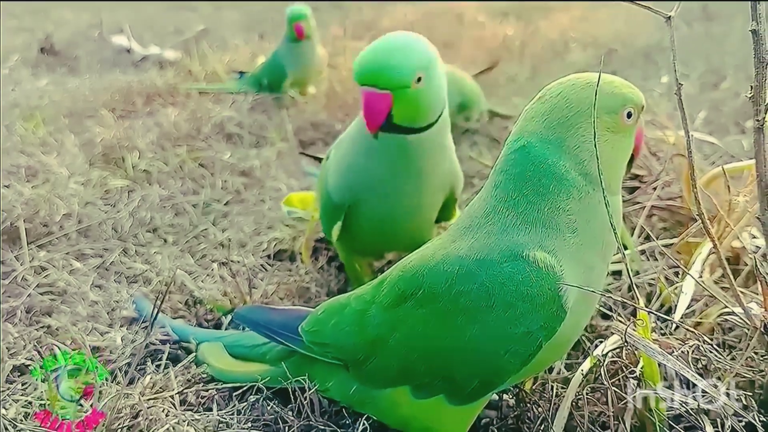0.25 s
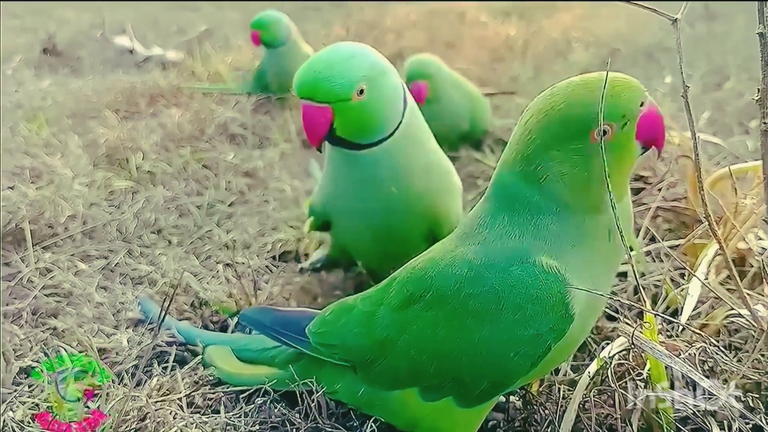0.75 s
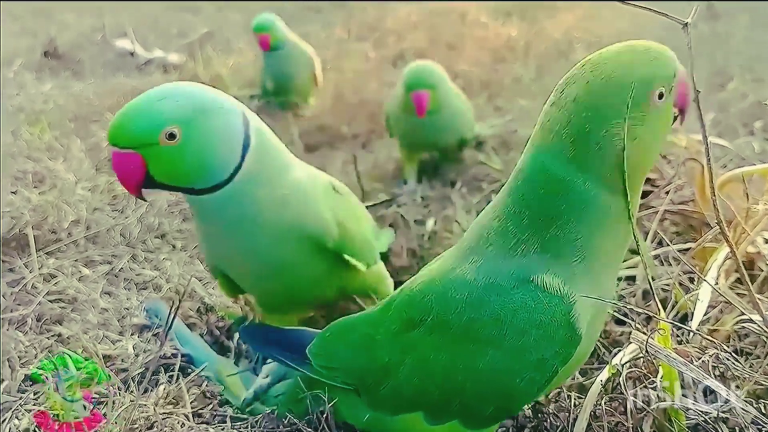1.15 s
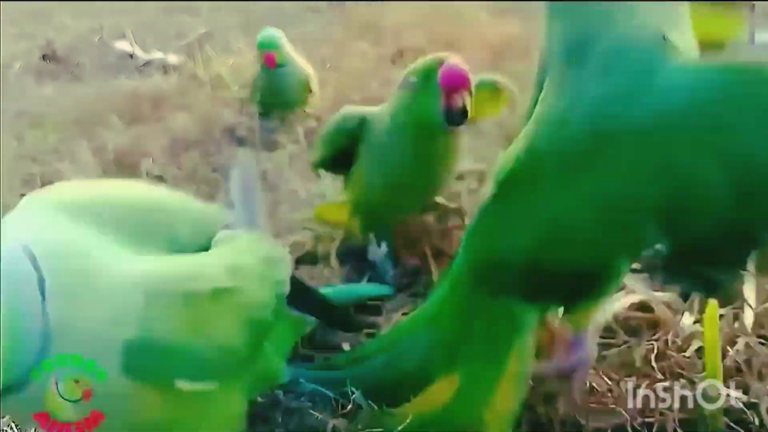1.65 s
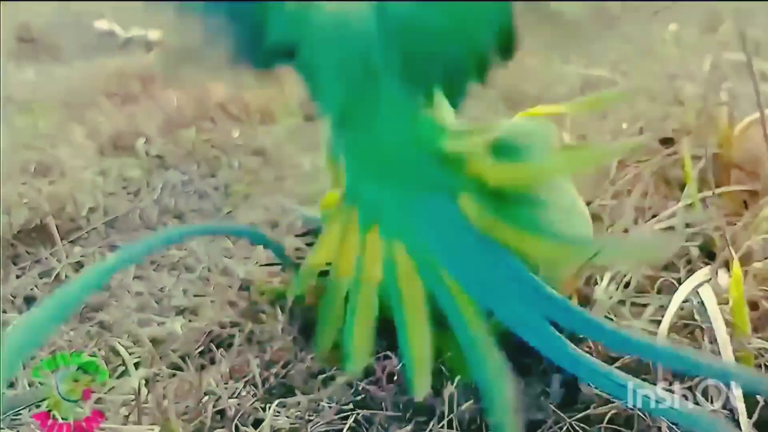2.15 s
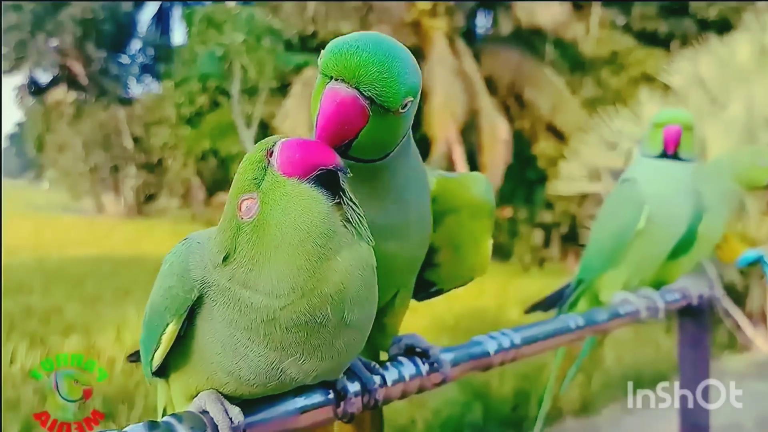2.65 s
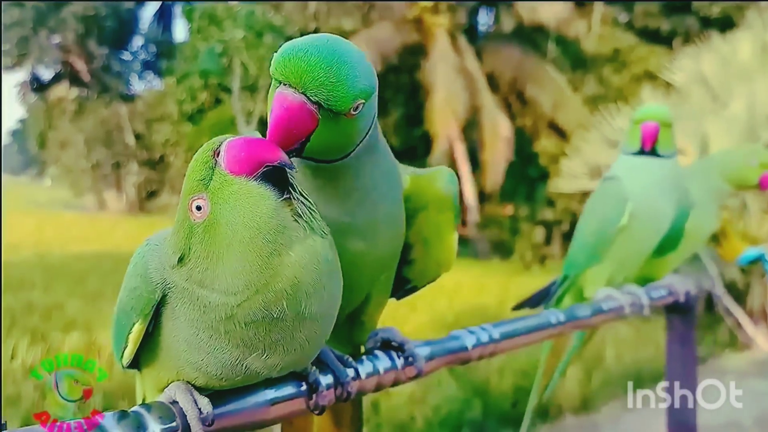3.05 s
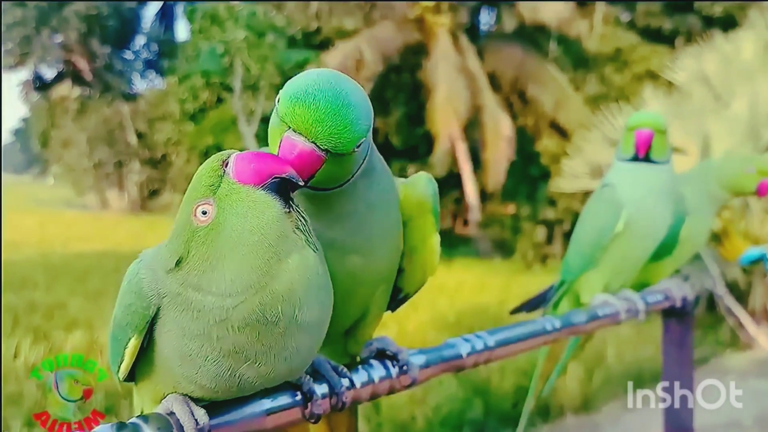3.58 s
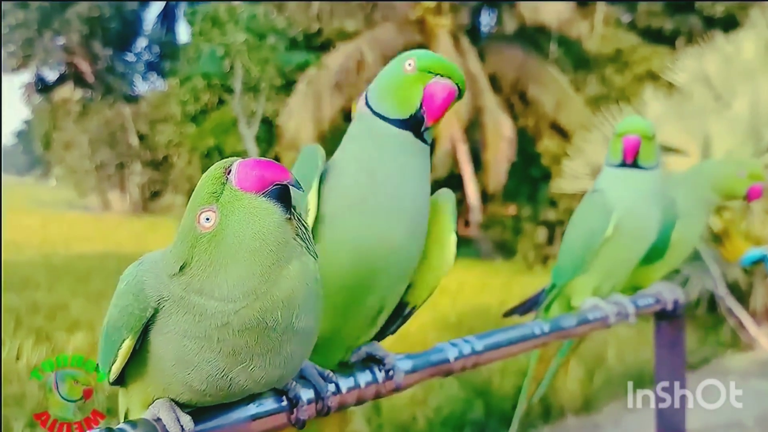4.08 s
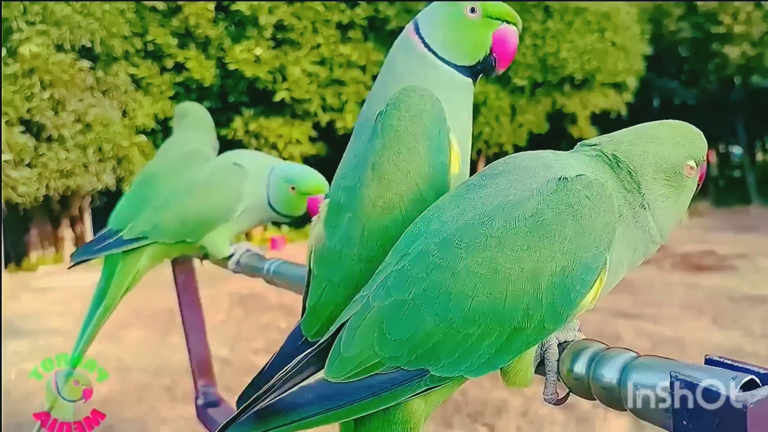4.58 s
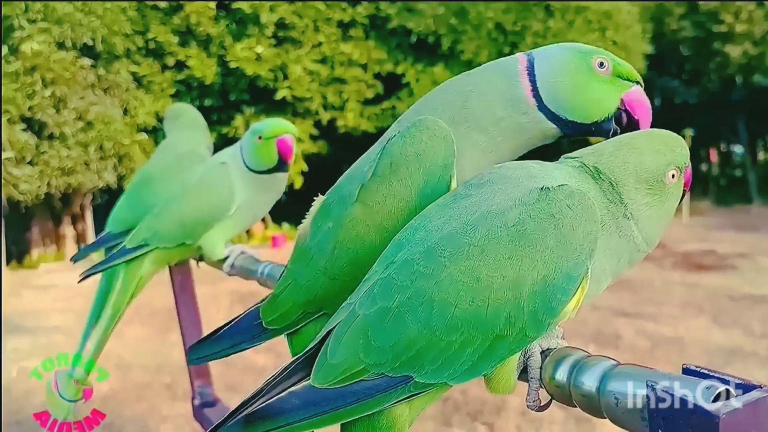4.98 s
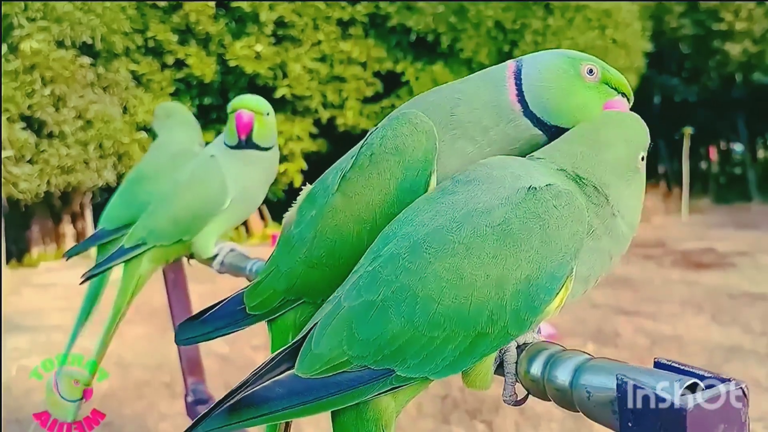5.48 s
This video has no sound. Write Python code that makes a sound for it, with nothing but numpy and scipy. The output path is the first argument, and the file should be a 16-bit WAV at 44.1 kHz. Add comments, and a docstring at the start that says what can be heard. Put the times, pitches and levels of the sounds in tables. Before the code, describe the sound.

Parakeets chatter, squawk hoarsely and whistle close by, over a distant screeching flock and a low outdoor rumble.

```python
"""Parakeets in the open

Close to a two-port microphone, one parakeet chatters and slides, one squawks hoarsely, one whistles,
with short clucks between. Each voice is syrinx overtones plus breath, shaped by the throat.
Far off, a flock screeches among trees, single birds chirp and a dove-like coo fades at the start.
A low rumble lies under all."""
import sys
import numpy as np
from scipy import signal
from scipy.fft import rfft, irfft, next_fast_len
from scipy.io import wavfile
from scipy.ndimage import uniform_filter1d, map_coordinates

SR = 44100
rng = np.random.default_rng(int(sys.argv[2]) if len(sys.argv) > 2 else 0)


def pcm_store(signal):
    """Save signal as 16-bit PCM."""
    levels = np.round(np.clip(np.atleast_2d(signal), -1, 1) * 32767)
    wavfile.write(sys.argv[1], SR, levels.astype(np.int16).T)


N = 252693
TOP_HZ = 15900


# Registers: pitch_hz, odd_overtones_db, brightness_db_per_octave
CHATTER_REGISTERS = [(440, 10, -3.5), (616, -15, -4.5), (670, -3, -3.5), (740, -8, -0.95), (830, -9, 0.2),
                     (900, -7, 0), (1050, 1.5, -3)]
SLIDE_REGISTERS = [(402, 13, -14), (660, -7, -1.5), (970, -21, 3.5), (1177, -0.5, 1.8), (1380, 10, 0.3),
                   (1560, 2, -2), (2550, 3.5, 0.5)]
SQUAWK_REGISTERS = [(550, -5, -9), (1223, -20, -4.5), (1470, -7, -1.5), (1700, -3, 2.5), (1928, -9, 3.5),
                    (1965, -28, 8.5), (2300, -27, 1)]
WHISTLE_REGISTERS = [(1120, -1, -3.5), (1327, 4.5, 2), (1560, 5.5, -1.5), (1790, -7, -2.5), (2260, 3, 1.2),
                     (2504, 9, -0.6), (3140, -0.5, -4)]
# Hoarseness: pitch_hz, breath_share, clear_overtones
CHATTER_ROUGH = [(450, .3, 7), (600, .08, 8), (740, .1, 13), (860, .18, 10), (960, .3, 5.5),
                 (1060, .36, 4.5)]
SLIDE_ROUGH = [(420, .16, 6), (700, .18, 8), (1000, .17, 9), (1200, .1, 9.5), (1700, .08, 6.5),
               (2500, .07, 4.5)]
SQUAWK_ROUGH = [(500, .4, 3), (1200, .55, 2.5), (1400, .85, 1.5), (1490, .995, 2), (1550, .55, 8),
                (1750, .44, 12), (1980, .38, 9), (2300, .58, 3)]
WHISTLE_ROUGH = [(1120, .45, 5), (1320, .22, 6.5), (1430, .5, 3.5), (1600, .27, 5), (2300, .26, 4.5),
                 (2430, .18, 5), (2485, .022, 6.5), (3100, .07, 5)]
# Throat responses: freq_hz, gain_db
CHATTER_THROAT = [(210, -39), (350, -9.5), (700, -11), (1050, -10), (1460, 0.5), (2050, 2), (2380, -16.5),
                  (2850, 2), (3800, 1), (4450, -16), (5110, -4.5), (5710, -3.5), (7960, -12), (8900, -27),
                  (12800, -15.5), (15500, -52)]
SLIDE_THROAT = [(210, -42), (350, -5), (1240, 2), (2390, -0.5), (2890, 1.5), (4160, 1.5), (4430, -1.5),
                (5110, -6.5), (7010, -12.5), (7960, -10), (9480, -17.5), (10600, -21.5), (15500, -21.5)]
SQUAWK_THROAT = [(240, -73), (400, -26), (1420, -18.5), (1910, -9.5), (2840, -7.5), (3850, 1.5),
                 (5000, -14), (6780, -3.5), (7440, -12.5), (9790, -9.5), (12300, -22), (14800, -33.5),
                 (15500, -67)]
WHISTLE_THROAT = [(470, -65), (800, -24), (1150, -11), (1600, -5.5), (1910, -2), (2500, 6.5), (3720, -4),
                  (5010, -5.5), (6510, -2.5), (7740, -4.5), (8870, -17), (13500, -13), (15500, -16)]
# Places, two lists each: freq_hz, left_minus_right_db; freq_hz, left_lead_rad
CHATTER_PLACE = ([(60, -2), (92, 4), (140, -2), (210, 0.0), (330, 7), (500, -0.5), (770, -1.5), (1170, -1),
                  (1790, -3), (2740, -11), (4190, 0.5), (6410, -10), (9810, -1), (15000, -1.5)], [(0, 3),
                  (2760, -1.4), (3790, -1.3), (4570, -9), (5340, -14), (6030, -8.5), (8100, -23.5),
                  (8700, -30), (9990, -8.5), (11000, -10), (11700, -25.5), (12900, -23.5), (14600, 5),
                  (16000, -12)])
SLIDE_PLACE = ([(60, 20), (92, -1), (140, -2), (210, -7), (330, -0.5), (500, -1.5), (770, -0.5),
                (1170, -3.5), (1790, 5.5), (2740, -9), (4190, -12.5), (6410, -4), (9810, 1.5), (15000, 0)],
                [(0, 4.5), (2070, -1.5), (2930, 4.5), (3530, -3), (4390, -5.5), (4650, -10.5), (5430, -6.5),
                (8270, -15), (8790, -12.5), (11000, -0.5), (11800, -8.5), (13200, -18), (14900, -27),
                (16000, -31)])
SQUAWK_PLACE = ([(60, -35), (110, -6), (200, 1), (380, -5), (700, -13.5), (1290, -4.5), (2380, -24.5),
                 (4400, -6.5), (8120, -6.5), (15000, -6.5)], [(0, 1), (430, 1.8), (1720, 11), (3360, 8.5),
                 (4570, 16.8), (6460, 17.2), (6980, 17.7), (9650, 24.7), (10100, 27.7), (12700, 17),
                 (14500, 2.5), (14700, 29), (15200, 10), (16000, 18)])
WHISTLE_PLACE = ([(60, -9), (99, 0.0), (160, 5), (270, -2), (450, 0), (740, 4), (1220, 2.5), (2010, -1.5),
                  (3330, -1.5), (5500, 2), (9080, -12), (15000, 1)], [(0, 5), (2240, -1.72), (2670, -2.5),
                  (3360, -7.5), (4050, -11), (5080, -18.0), (6550, -18), (7670, -27), (9220, -40),
                  (10100, -51), (11000, -50), (11900, -53.3), (14000, -53.5), (16000, -59)])
TURNED_PLACE = ([(60, 0.5), (110, -12), (200, -3), (380, 0.0), (700, -8), (1290, 3), (2380, -8.5),
                 (4400, -3.5), (8120, -10), (15000, 3)], [(0, 7), (2150, 5.5), (3270, -3), (3960, 3),
                 (4910, 3), (6200, -8.5), (7750, -15), (8440, -20.5), (8960, -33), (9560, -26),
                 (12400, -36), (14000, -33.5), (14600, -55), (16000, -46)])
# Contours, one list per note: time_s, pitch_hz, level_db
SLIDES = [
    [(4.019, 2570, -65), (4.03, 2625, -34.5), (4.045, 2570, -35), (4.068, 2450, -46.5), (4.082, 2550, -53)],
    [(4.086, 1770, -31), (4.091, 1687, -23.5), (4.11, 1503, -22), (4.152, 1349, -24), (4.24, 1175, -27),
     (4.275, 1102, -27.5), (4.288, 1038, -28), (4.33, 811, -31), (4.356, 574, -41.5), (4.375, 406, -48.5)],
    [(5.083, 445, -43.5), (5.099, 609, -43), (5.121, 730, -34), (5.141, 654, -37), (5.16, 460, -38),
     (5.174, 327, -47.5)],
]
WHISTLES = [
    [(5.272, 1130, -33), (5.277, 1107, -11), (5.283, 1140, -18.5)],
    [(5.284, 1100, -32), (5.288, 1112, -21), (5.291, 1130, -13.5), (5.294, 2246, -18.5), (5.32, 2446, -22),
     (5.36, 2562, -19), (5.41, 2521, -14.5), (5.427, 2278, -18.5), (5.431, 1715, -16), (5.445, 1485, -13),
     (5.455, 1418, -16.5), (5.459, 1360, -17.5), (5.481, 1311, -14.5), (5.505, 1305, -63)],
    [(5.6, 3130, -49), (5.608, 3133, -12.5), (5.622, 2816, -20), (5.651, 2624, -21.5), (5.7, 2510, -21.5),
     (5.74, 2472, -20.5)],
]

def parakeets(head_turn_s=5.55):
    """Near birds with a faint echo; the whistler turns its head for the last note."""
    whistles = voice(WHISTLES, WHISTLE_REGISTERS, WHISTLE_ROUGH, WHISTLE_THROAT, flutter_db=0.7,
                     breath_db_per_octave=-1.5)
    chatter = voice(chatter_notes(), CHATTER_REGISTERS, CHATTER_ROUGH, CHATTER_THROAT, flutter_db=3,
                    breath_db_per_octave=3)
    slides = voice(SLIDES, SLIDE_REGISTERS, SLIDE_ROUGH, SLIDE_THROAT, flutter_db=3.5,
                   breath_db_per_octave=4)
    squawks = voice(squawk_notes(), SQUAWK_REGISTERS, SQUAWK_ROUGH, SQUAWK_THROAT, flutter_db=6.5,
                    breath_db_per_octave=7)
    turned = np.arange(N) > head_turn_s * SR
    direct = (placed(chatter, CHATTER_PLACE, gain_db=1.5)
              + placed(slides, SLIDE_PLACE, gain_db=6)
              + placed(squawks, SQUAWK_PLACE, gain_db=3)
              + placed(whistles * ~turned, WHISTLE_PLACE, gain_db=3)
              + placed(whistles * turned, TURNED_PLACE, gain_db=4)
              + placed(clucks(), SLIDE_PLACE, gain_db=1.5))
    return direct + amp(-16) * tree_echo(direct[1])


def voice(notes, registers, rough, throat, flutter_db, breath_db_per_octave):
    """Syrinx overtones and breath puffing once a cycle, both shaped by the throat."""
    out = np.zeros((2, N))
    breath_gain = lambda hz: amp(along(throat, hz) + breath_db_per_octave * np.log2(hz / 3000 + 0.01))
    for rows in notes:
        first, count, fade = note_span(rows, edge_s=0.0022)
        hz, db, *hollow_db = uniform_filter1d(curves(rows, first, count), size=160, axis=1)
        odd_db, bright_db = columns_at(registers, hz)
        odd_db = odd_db + sum(hollow_db)  # hollow notes have weaker odd overtones
        breath_share, clear = columns_at(rough, hz)
        k = np.arange(1, min(24, TOP_HZ // hz.min()) + 1)[:, None]
        hz = hz * (1 + 0.03 * breath_share * wobble(300, count))
        phase = 2 * np.pi * np.cumsum(hz) / SR
        # Uneven cycles smear and weaken the upper overtones: rasp.
        jitter = wobble(2500, count) + 0.5 * np.array([wobble(2500, count) for _ in range(2)])[:, None]
        smear = np.minimum(k / clear, 1.5) ** 4 * jitter
        rolloff = (k * hz < TOP_HZ) / (1 + 0.82 * (k / clear) ** 2)
        breath = rng.standard_normal(count) + 1.3 * rng.standard_normal((2, count))
        puffs = unit_rms(filtered(breath, breath_gain)) * (1 + 0.23 * np.cos(phase))
        beak_db = flutter_db * np.array([wobble(33.1, count) for _ in k])  # the moving beak
        register_db = odd_db * (k % 2) * (k > 1) * (3 / k) ** 1.9 + bright_db * np.log2(k)
        weight = amp(along(throat, k * hz) + register_db + beak_db) * rolloff
        tone = np.sum(weight * np.cos(k * phase + 0.361 * k ** 2 + smear), axis=1)
        tone /= np.sqrt(np.sum(weight ** 2, axis=0) / 2)
        note = np.sqrt(1 - breath_share ** 2) * tone + breath_share * puffs
        out[:, first:first + count] += amp(db) * fade * note
    return out


# Chatter: start_s, length_s, first_hz, turn_after_s, turn_hz, last_hz, bend_exponent,
CHATTER = [(2.725, 0.089, 723, 0.037, 602, 777, 2.76, -33.5, 1, None, -5),
           (2.859, 0.12, 1003, 0.059, 715, 795, 2.7, -22.5, -14, -23.5, -3),
           (3.018, .119, 1032, .073, 741, 827, 2.4, -20.5, -15, -19.5, -4),
           (3.177, 0.12, 1056, 0.0079, 1067, 377, 1.08, -21, -33.5, -20, -7)]

def chatter_notes(linger=0.88, release_s=0.012, release_db=-30, pip_lead_s=0.016, pip_edge_db=-15.5):
    """Notes that glide to a turning pitch and leave it again, most just after a pip."""
    notes = []
    for start, length, first_hz, turn, turn_hz, last_hz, bend, db, sag_db, pip_db, hollow_db in CHATTER:
        if pip_db is not None:
            notes.append([(start - pip_lead_s * lead, first_hz, pip_db + pip_edge_db * edge)
                          for lead, edge in [(0.89, 0.45), (0.56, 0), (0.06, 1)]])
        t = np.linspace(0, length, num=40)
        before = np.clip(t / turn, 0, 1)
        after = np.clip((t - turn) / (length - turn), 0, 1)
        approach_hz = (first_hz - turn_hz) * (1 - before) ** 2 * (1 + linger * before)
        hz = turn_hz + approach_hz + (last_hz - turn_hz) * after ** bend
        release = np.clip(1 - (length - t) / release_s, 0, 1) ** 2
        level_db = db + sag_db * (t / length) ** 2.96 + release_db * release
        notes.append(np.transpose([start + t, hz, level_db, np.full_like(t, hollow_db)]))
    return notes


# Yelps, one list per note: time_s, pitch_hz, level_db
YELPS = [
    [(4.484, 619, -56), (4.498, 1011, -44.5), (4.508, 1240, -54)],
    [(4.515, 2003, -36.5), (4.53, 1974, -45.5), (4.54, 1962, -21.5), (4.552, 1880, -26.5),
     (4.57, 1610, -29)],
]
# Squawks: start_s, scoop_s, head_s, head_hz, head_db, body_s, body_hz, last_hz, body_db, tail_s
SQUAWKS = [(4.57, 0.0028, 0.0044, 2330, -32.5, 0.042, 1922, 1930, -26.5, .065),
           (4.753, 0.029, 0.024, 2282, -34.5, 0.083, 1813, 1522, -29.5, 0.055),
           (5.006, .032, .02, 2358, -30, .088, 1822, 1538, -28, 0.034)]

def squawk_notes(scoop_hz=505, break_hz=1200, tail_hz=1514, tail_db=-25.5):
    """Two yelps, then squawks that scoop up, break into a high head, drop to a body and end in breath."""
    notes = list(YELPS)
    for start, scoop, head, head_hz, head_db, body, body_hz, last_hz, body_db, tail in SQUAWKS:
        step_s, hz, db = np.transpose([
            (0, scoop_hz, head_db - 15.5), (0.6 * scoop, break_hz, head_db - 5.5),
            (0.4 * scoop, head_hz, head_db), (head, head_hz, head_db),
            (0.013, body_hz, body_db), (body, last_hz, body_db),
            (0.0068, tail_hz, body_db + tail_db / 4), (tail, tail_hz, body_db + tail_db)])
        notes.append(np.transpose([start + np.cumsum(step_s), hz, db]))
    return notes


# Clucks: start_s, level_db, pulse_rate_hz, length_s
CLUCKS = [(3.431, -58, 508, 0.02), (3.71, -59.5, 503, 0.023), (3.963, -28, 510.3, 0.017),
          (5.238, -25, 534.6, 0.01), (5.575, -29, 528, 0.016)]
# Cluck colour: freq_hz, gain_db
CLUCK_COLOUR = [(150, -46), (250, -7), (466, 3), (852, -4), (1920, 8), (2490, -7), (3220, 6), (4100, 2),
                (4470, -6.5), (6420, -4.5), (9890, -15.5), (11800, -15.5), (15500, -25)]

def clucks():
    """A few throat pulses and a puff under one short bump."""
    out = np.zeros(N)
    for start, db, rate_hz, length in CLUCKS:
        t = np.arange(round(length * SR)) / SR
        pulses = 6 * np.diff(np.floor(t * rate_hz), prepend=0)
        puff = 0.5 * rng.standard_normal(len(t))
        bump = np.sin(np.pi * (t / length) ** 0.4) ** 2
        out[round(start * SR):][:len(t)] += amp(db + 9.5) * (pulses + puff) * bump
    return coloured(out, CLUCK_COLOUR)


def placed(x, place, gain_db):
    """A near bird reaches the two ports with unlike strength and delay."""
    balance, lead = place
    ports = np.array([[0.5], [-0.5]])

    def response(hz):
        low_cut = 1 / (1 + (250 / (hz + 1)) ** 6)  # the near voices carry almost nothing below about 250 Hz
        return low_cut * amp(ports * along(balance, hz)) * np.exp(1j * ports * along(lead, hz))
    return amp(gain_db) * filtered(x, response)


# Chirps: start_s, length_s, first_hz, last_hz, glide_exponent, level_db
CHIRPS = [(0.061, 0.028, 4180, 5800, 1.1, -61), (0.081, 0.037, 5780, 5100, 0.87, -48.5),
          (0.128, 0.078, 4490, 3910, 1.26, -39), (0.23, 0.053, 3574, 3180, 1.13, -29.5),
          (0.718, 0.059, 3610, 4340, 2, -48), (0.795, 0.094, 2760, 2660, 0.82, -45.5),
          (0.93, 0.095, 3210, 3290, 0.91, -47), (1.14, 0.044, 3530, 3370, 0.79, -45),
          (1.252, 0.083, 2780, 2750, 1.1, -50), (1.51, 0.064, 2760, 2690, 1.3, -57),
          (2.06, 0.049, 2900, 1825, 1.25, -50), (2.116, 0.058, 3250, 3120, 1.4, -42.5),
          (2.24, .07, 4150, 4770, .9, -59), (2.41, 0.12, 3135, 3440, 1.7, -58),
          (2.485, 0.11, 3140, 2020, 6.5, -45), (3.129, 0.029, 3130, 3350, .9, -35),
          (3.333, 0.12, 4730, 4430, 1.7, -58.5), (3.459, 0.12, 3150, 3220, 1.4, -56),
          (3.561, 0.091, 3230, 3300, 0.81, -51), (3.686, 0.054, 3600, 4130, 1.18, -56),
          (3.747, 0.021, 4300, 3280, 1.08, -54)]
# Coo: time_s, pitch_hz, level_db
COO = [(0.02, 570, -66), (0.074, 676, -60), (0.11, 705, -75), (0.17, 766, -105), (0.212, 735, -55),
       (0.3, 754, -58.5), (0.452, 681, -62), (0.544, 607, -61), (0.78, 567, -82)]

def far_birds():
    """Gliding, fading chirps and a coo from the left, softened by their echo."""
    u = np.linspace(0, 1, num=20)
    fade_db = np.interp(u, [0, 0.41, 1], [1.5, 0, -4])
    notes = []
    for start, length, first_hz, last_hz, glide, db in CHIRPS:
        hz = last_hz + (first_hz - last_hz) * (1 - u) ** glide
        notes.append(np.transpose([start + length * u, hz, db + fade_db]))
    chirps = wavering_tones(notes, waver=0.018)
    coo = wavering_tones([COO], waver=0.01)
    cooing = amp(2.5) * from_left(coo) + amp(-0.5) * tree_echo(coo)
    return cooing + amp(2) * from_left(chirps) + amp(-1) * tree_echo(chirps)


# Noise spectra: freq_hz, gain_db
SCREECH = [(710, -87), (1200, -76), (1580, -31.5), (2430, 0), (2740, 1), (3070, 5.5), (3270, 3), (3750, 0),
           (4630, -3), (5150, -31), (6500, -23.5), (8450, -38), (14300, -120)]
RASP = [(2650, -76), (4500, 6.5), (5130, -0.5), (7810, -6.5), (8450, -7.5), (12900, -18), (14100, -18.5),
        (15500, -23), (15800, -58)]
HISS = [(530, -12), (900, -19.5), (1510, -2), (1660, -36), (2190, 2), (2410, -16), (5370, 4), (13400, -1),
        (14900, -35), (15800, -33)]
# Flock and wash width: freq_hz, left_right_correlation
FLOCK_CORRELATION = [(60, 0.93), (180, 0.84), (550, 0.25), (1650, 0.49), (4970, -0.23), (15000, 0.16)]

def flock_and_wash(split_hz=3500):
    """Patchy noise over faint hiss: far screeches blurred by trees, then the near calls' echo wash."""
    low_gain, high_gain, rasp_gain = swell_gains()
    throb_db = 0.3 * wobble(29.94)
    crowd = patchy_noise(SCREECH, FLOCK_CORRELATION, patchy_db=6) + amp(-12) * twittering(count=240)
    low = filtered(crowd, lambda hz: 1 / (1 + (hz / split_hz) ** 12))
    screech = low_gain * low + high_gain * (crowd - low)
    hiss = amp(-72.5) * unit_rms(coloured(rng.standard_normal((2, N)), HISS))
    rasp = amp(1) * rasp_gain * patchy_noise(RASP, FLOCK_CORRELATION, patchy_db=6.5)
    return amp(throb_db) * (screech + rasp) + hiss


# Swells of far flock screeching; the last two are the echo wash of the near calls:
# start_s, rise_s, hold_s, fall_s, screech_db, rasp_db, high_minus_low_db
SWELLS = [(-0.04, 0.031, .02, .06, -58.5, -77, -10), (0.111, 0.032, 0.1, 0.093, -32, -32.5, 13),
          (0.295, 0.023, 0.17, 0.079, -48.5, -54.5, 13.5), (0.418, 0.14, .02, .14, -39.5, -47, 20),
          (0.711, 0.016, 0.068, 0.032, -51, -55, 14), (0.775, .12, 0.085, .12, -42.5, -51.5, 13.5),
          (1.108, 0.033, 0.083, 0.11, -50, -57, 0), (1.21, 0.1, 0.024, .1, -42, -48.5, 18.5),
          (1.469, 0.047, 0.035, 0.1, -43, -55.5, -6), (1.563, 0.075, 0.068, 0.13, -44, -54.5, 9),
          (1.789, 0.056, .15, 0.047, -49, -59.5, 11.5), (1.975, 0.041, 0.12, 0.1, -40, -50, -0.5),
          (2.203, 0.074, .11, .012, -54.5, -52.5, -1), (2.435, 0.046, 0.29, .05, -55, -81, -6),
          (3.12, 0.019, 0.068, .04, -34.5, -40.5, 3), (3.204, 0.042, 0.15, 0.074, -49.5, -61, -2),
          (3.448, .008, 0.016, 0.12, -52.5, -57.5, -5), (3.509, 0.086, 0.024, .02, -50.5, -69, 11),
          (3.648, 0.024, 0.024, 0.048, -54, -68, 23), (4.466, 0.024, 0.76, .05, -51.5, -52.5, 1.5),
          (5.473, .03, 0.06, .05, -53, -66, 6)]

def swell_gains(edge_db=-21, murmur_db=-64, murmur_rasp_db=-67):
    """Gains of low band, high band and rasp: a murmur plus every swell."""
    t = np.arange(N) / SR
    power = np.ones((3, N)) * amp([[murmur_db], [murmur_db], [murmur_rasp_db]]) ** 2
    for start, rise, hold, fall, db, rasp_db, tilt_db in SWELLS:
        corners_s = start + np.cumsum([0, rise, hold, fall])
        shape_db = np.interp(t, corners_s, [edge_db, 0, 0, edge_db], left=-99, right=-99)
        power += amp(shape_db + [[db - tilt_db / 2], [db + tilt_db / 2], [rasp_db]]) ** 2
    return np.sqrt(power)


def twittering(count):
    """A random crowd of short gliding tones, heard mostly as echo."""
    onset, pitch, duration, glide, faintness = rng.random((count, 5)).T[:, :, None]
    t = np.arange(SR // 9) / SR
    hz = 2100 * 2.4 ** pitch
    length_s = 0.03 + 0.08 * duration
    phase = 2 * np.pi * hz * (t + 1.006 * (glide - 0.65) * t ** 2)
    envelope = np.sin(np.pi * np.clip(t / length_s, 0, 1))
    tones = amp(along(SCREECH, hz) - 11 * faintness) * envelope * np.sin(phase)
    samples = (onset * N).astype(int) + np.arange(len(t))
    direct = np.bincount(samples.ravel(), tones.ravel(), N + len(t))[:N]
    return unit_rms(0.3 * from_left(direct) + tree_echo(direct))


# Echo decay: freq_hz, t60_s
TREE_DECAY = [(500, 0.13), (3000, 0.13), (10000, 0.18)]

def tree_echo(x):
    """A diffuse tail, unlike at each port, whose decay time depends on frequency."""
    hz, t, bins = signal.stft(rng.standard_normal((2, SR // 3)), SR, nperseg=256)
    decay = amp(-60 * t / along(TREE_DECAY, hz)[:, None])
    tail = signal.istft(bins * decay, SR, nperseg=256)[1]
    return signal.oaconvolve(x[None], tail / np.linalg.norm(tail[0]), axes=1)[:, :N]


# Rumble envelope: time_s, level_db
RUMBLE_LEVEL = [(0.0, -61), (2.4, -58.5), (2.9, -53.5), (3.7, -58.5), (4.3, -55.5), (5.73, -57)]
# Rumble spectrum: freq_hz, gain_db
RUMBLE_SPECTRUM = [(12, -32), (20, -30), (43, -1.5), (85, -4), (118, -4.5), (194, -10.5), (222, -16),
                   (367, -16.5), (509, -16), (908, -24.5), (1020, -25.5), (1390, -27.5), (2000, -20.5),
                   (2600, -28), (4400, -120)]
# Rumble width: freq_hz, left_right_correlation
RUMBLE_CORRELATION = [(40, 1), (200, 0.89), (600, 0.3), (2000, 0.068)]
# Hum: time_s, pitch_hz, level_db
HUM = [(0, 53, -60), (2.5, 53, -76), (3, 55.3, -69.5), (5.73, 55, -73)]

def rumble():
    """Far traffic or wind, near mono, with a low wavering hum."""
    hum = wavering_tones([HUM], waver=0.13)
    level_db = curves(RUMBLE_LEVEL)[0] + 0.59 * wobble(3.8)
    return amp(level_db) * patchy_noise(RUMBLE_SPECTRUM, RUMBLE_CORRELATION, patchy_db=2) + hum


def wavering_tones(notes, waver):
    """Sine notes with random drift in pitch and level."""
    out = np.zeros(N)
    for rows in notes:
        first, count, fade = note_span(rows, edge_s=0.0038)
        hz, db = curves(rows, first, count)
        phase = 2 * np.pi * np.cumsum(hz * (1 + waver * wobble(80, count))) / SR
        out[first:first + count] += amp(db + 3 + 1.5 * wobble(40, count)) * fade * np.sin(phase)
    return out


def patchy_noise(spectrum, correlation, patchy_db):
    """Stereo noise of rms 1 with time-frequency patches of random gain."""
    bins = signal.stft(rng.standard_normal((2, N)), nperseg=512)[2]
    patches = uniform_filter1d(rng.standard_normal(bins.shape[1:]), size=2, axis=0)
    patches = unit_rms(uniform_filter1d(patches, size=9, axis=1))
    noise = signal.istft(bins * amp(patchy_db * patches), nperseg=512)[1][:, :N]

    def response(hz):
        width_rad = np.arccos(np.clip(along(correlation, hz), -1, 1)) / 2
        return amp(along(spectrum, hz)) * [np.cos(width_rad), np.sin(width_rad)]
    mid, side = filtered(noise, response)
    return unit_rms(np.array([mid + side, mid - side]))


def from_left(x):
    """Stereo pair, the right 18 samples late."""
    return np.array([x, np.roll(x, 18)])


def note_span(rows, edge_s):
    """First sample, sample count and edge fade of a note."""
    first, last = round(rows[0][0] * SR), min(round(rows[-1][0] * SR), N)
    t = np.arange(last - first) / SR
    return first, len(t), np.clip(np.minimum(t, t[::-1]) / edge_s, 0, 1)


def filtered(x, response):
    """x through a complex frequency response."""
    size = next_fast_len(x.shape[-1] + 8192)
    return irfft(rfft(x, size) * response(np.fft.rfftfreq(size, 1 / SR)), size)[..., :x.shape[-1]]


def coloured(x, spectrum):
    """x through a freq_hz, gain_db table."""
    return filtered(x, lambda hz: amp(along(spectrum, hz)))


def wobble(rate_hz, count=N):
    """Smooth random curve with knots at rate_hz."""
    knots = rng.standard_normal(int(count * rate_hz / SR) + 4)
    return map_coordinates(knots, [np.arange(count) * rate_hz / SR])


def curves(rows, first=0, count=N):
    """Per-sample values of each column after time_s."""
    return columns_at(rows, (first + np.arange(count)) / SR)


def columns_at(rows, at):
    """Later columns interpolated against the first."""
    axis, *columns = np.transpose(rows)
    return [np.interp(at, axis, column) for column in columns]


def along(points, hz):
    """A freq_hz, value table read on a log axis."""
    freq_hz, values = np.transpose(points)
    return np.interp(np.log(hz + 1), np.log(freq_hz + 1), values)


def amp(db):
    """dB to gain."""
    return 10 ** (np.asarray(db) / 20)


def unit_rms(x):
    """x at rms 1."""
    return x / np.sqrt(np.mean(x ** 2) + 1e-20)


def scene():
    """Near parakeets over far birds, flock, echo wash and rumble."""
    return parakeets() + far_birds() + flock_and_wash() + rumble()


def record(dry):
    """Brick-wall low-pass at TOP_HZ."""
    return filtered(dry, lambda hz: hz < TOP_HZ)


dry = scene()
out = record(dry)
pcm_store(out)
```